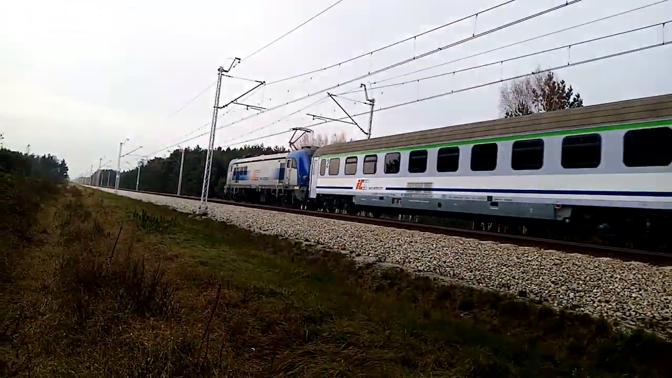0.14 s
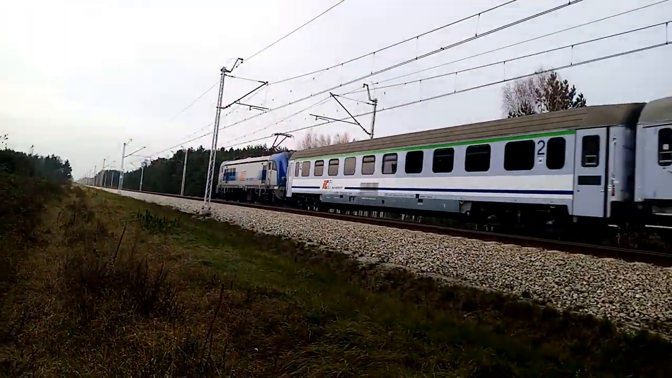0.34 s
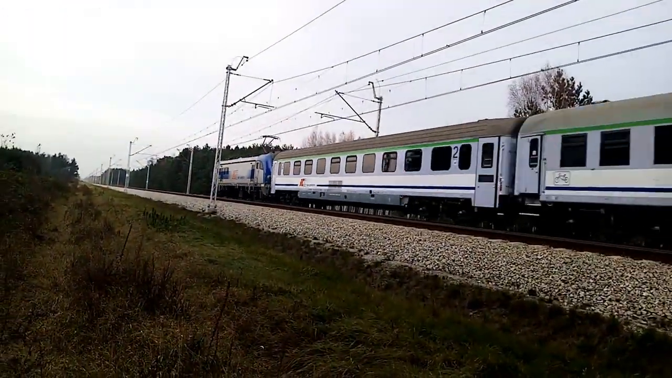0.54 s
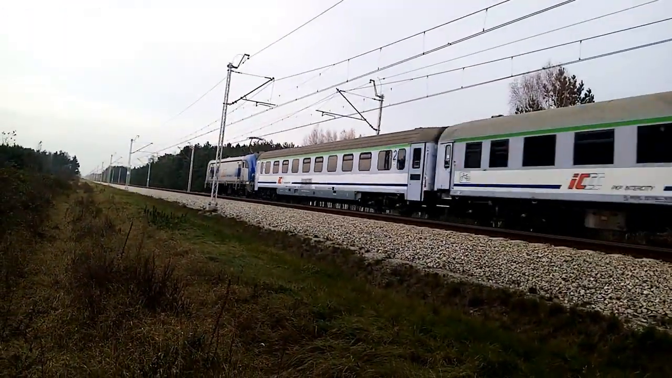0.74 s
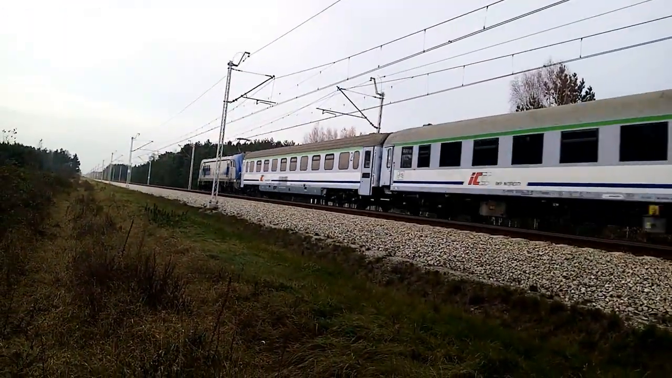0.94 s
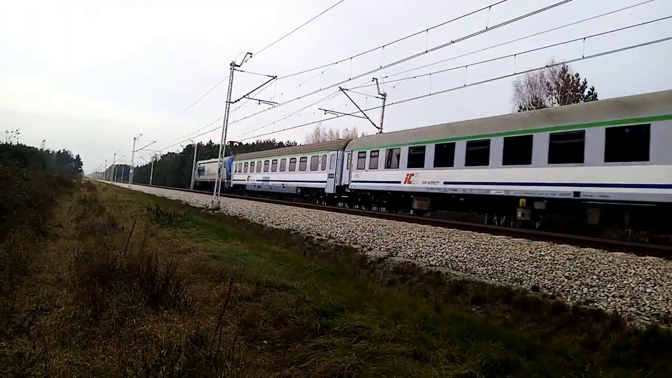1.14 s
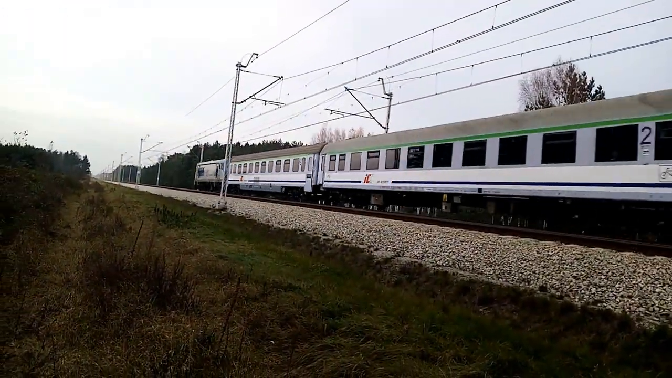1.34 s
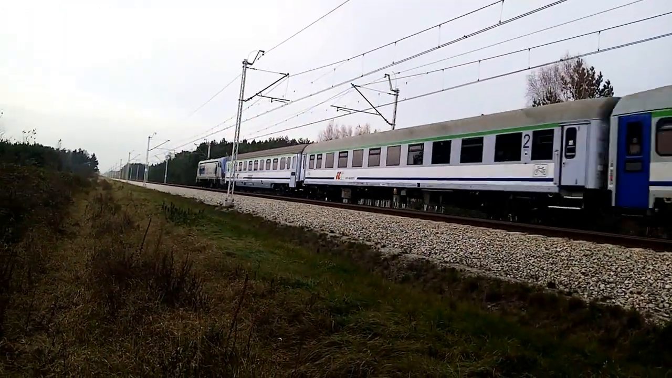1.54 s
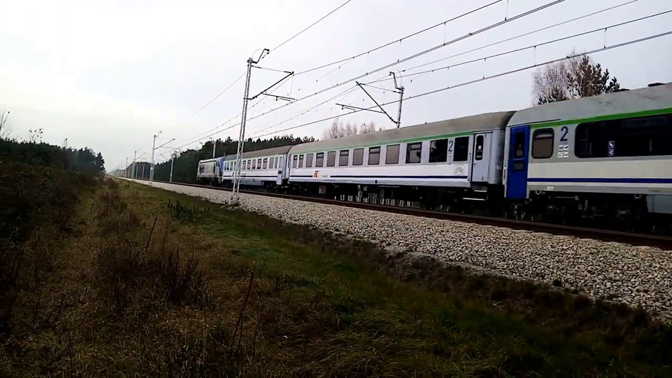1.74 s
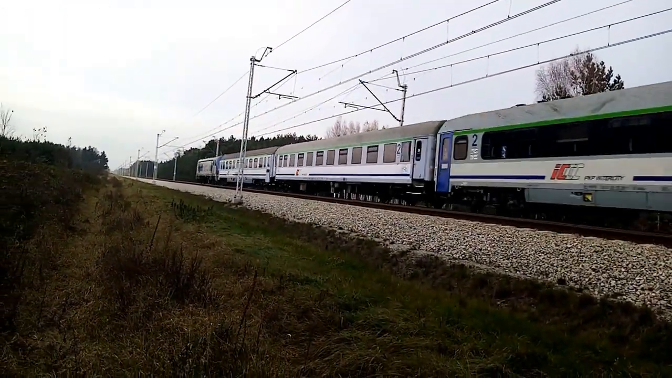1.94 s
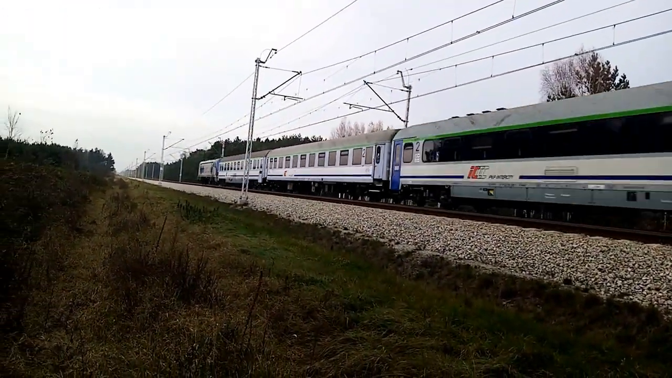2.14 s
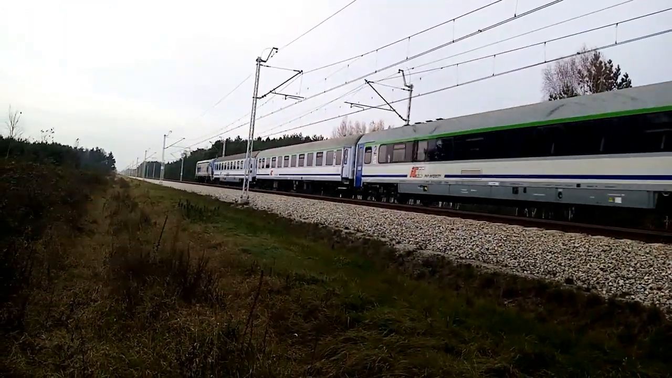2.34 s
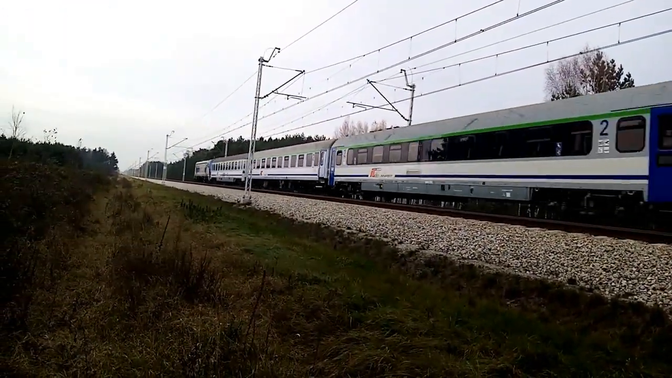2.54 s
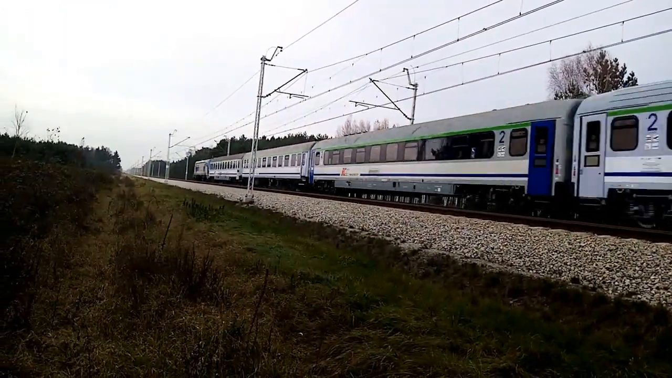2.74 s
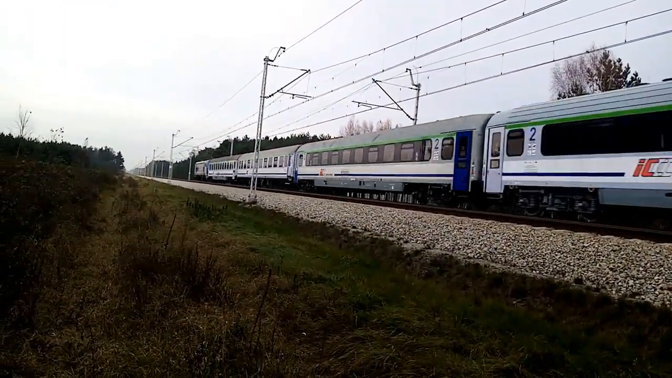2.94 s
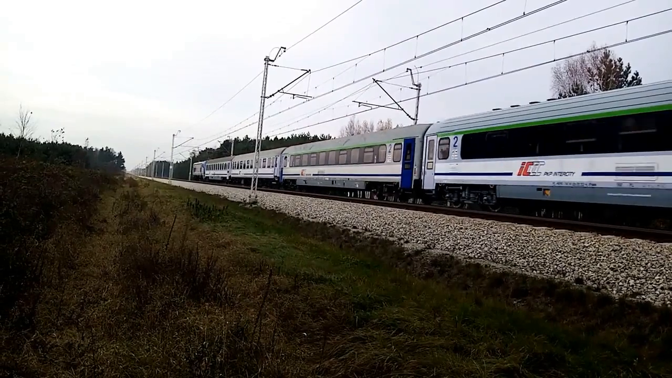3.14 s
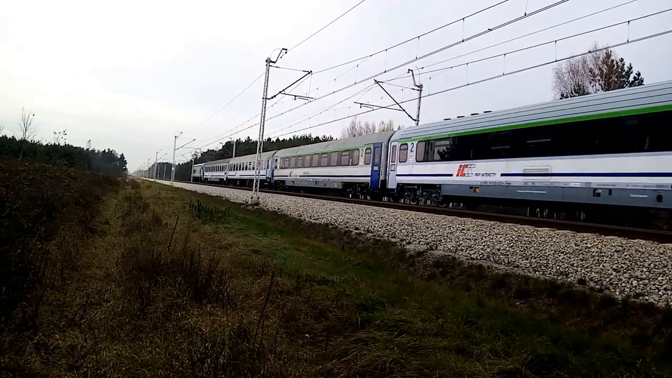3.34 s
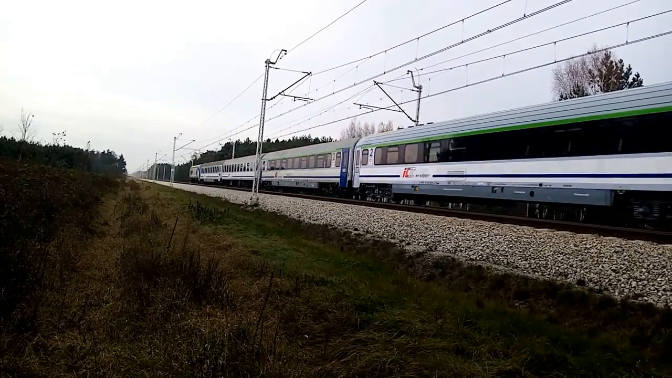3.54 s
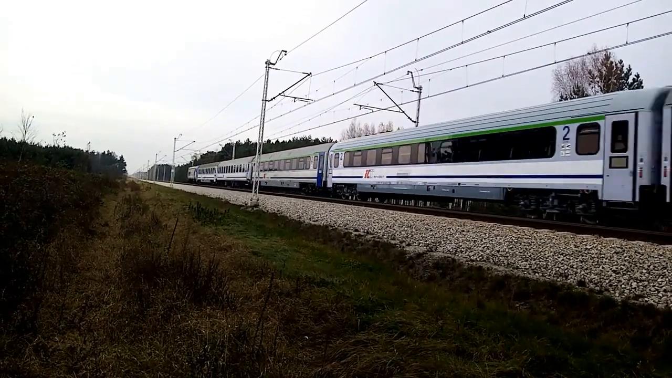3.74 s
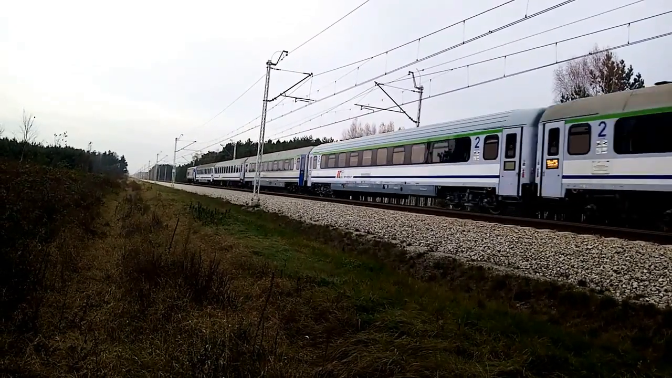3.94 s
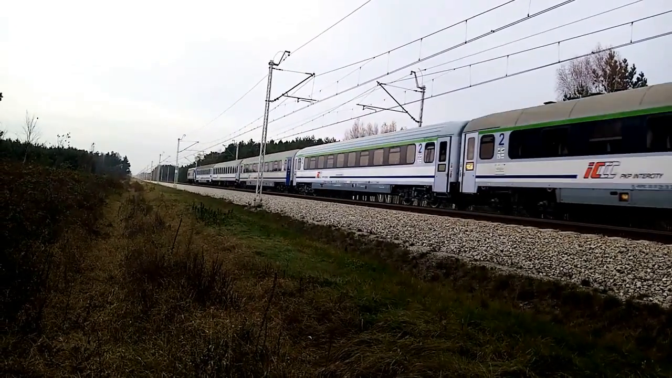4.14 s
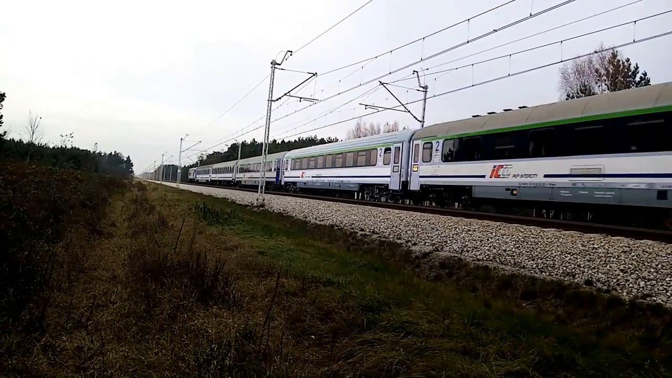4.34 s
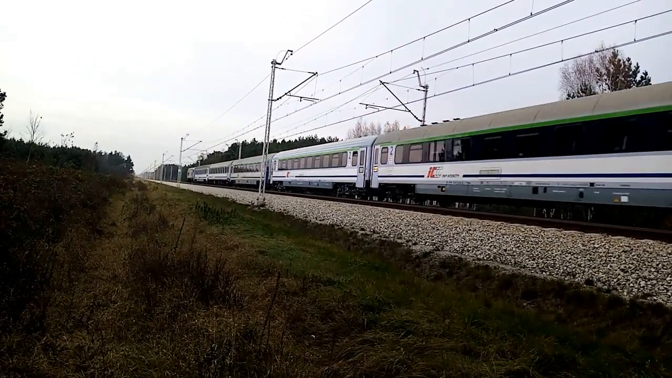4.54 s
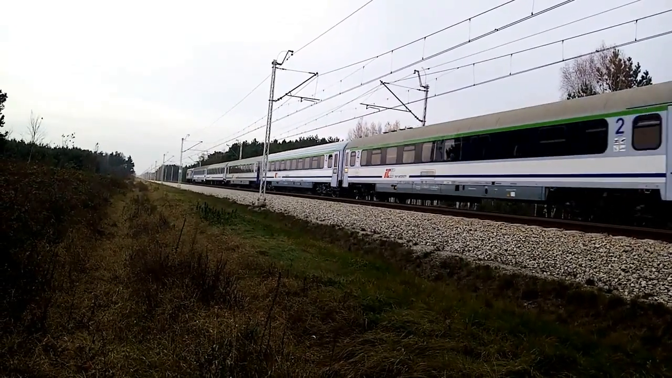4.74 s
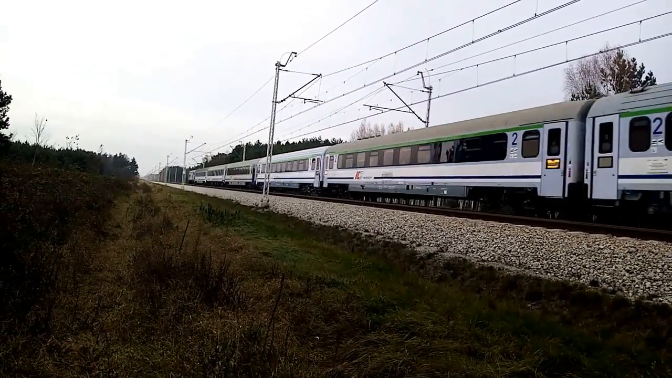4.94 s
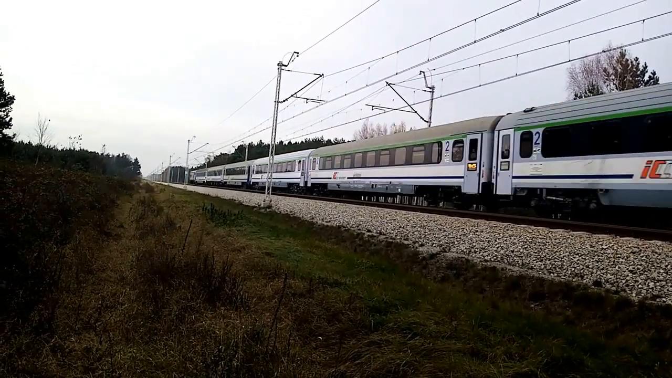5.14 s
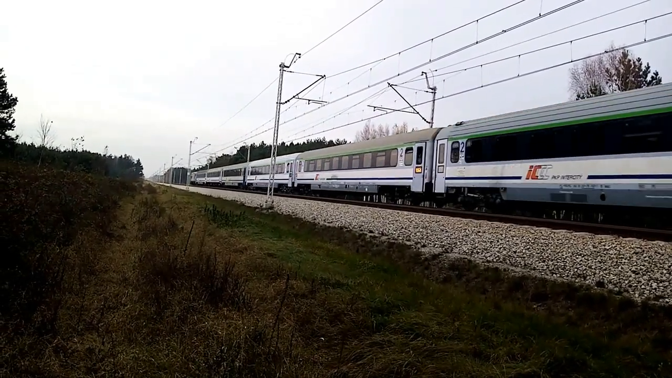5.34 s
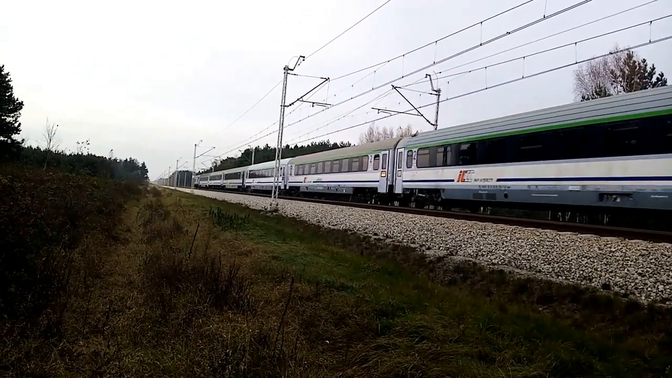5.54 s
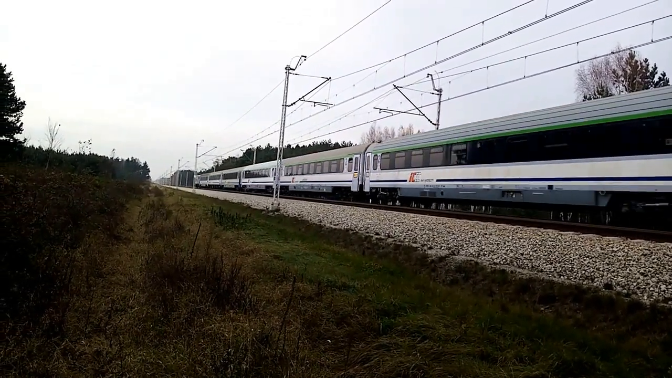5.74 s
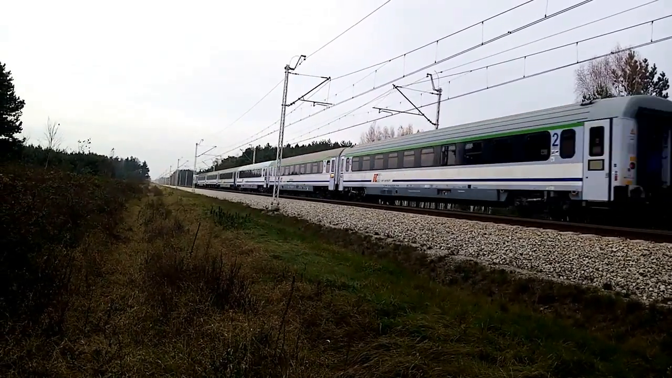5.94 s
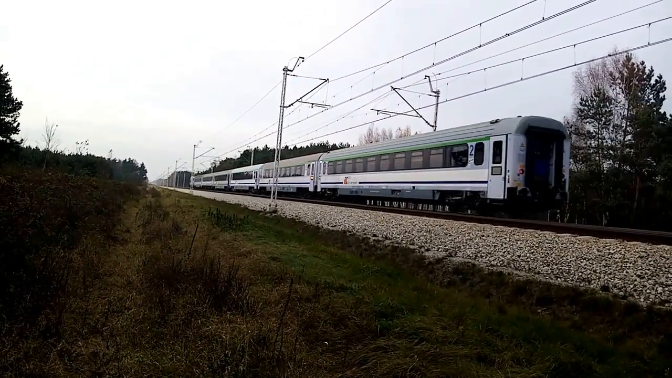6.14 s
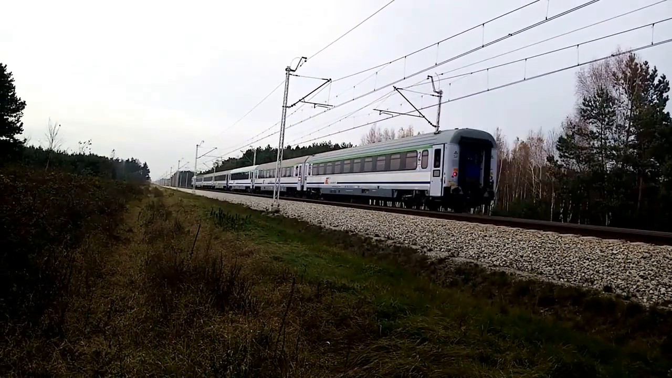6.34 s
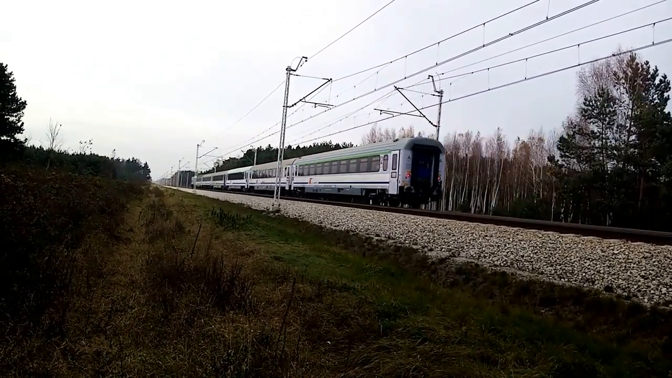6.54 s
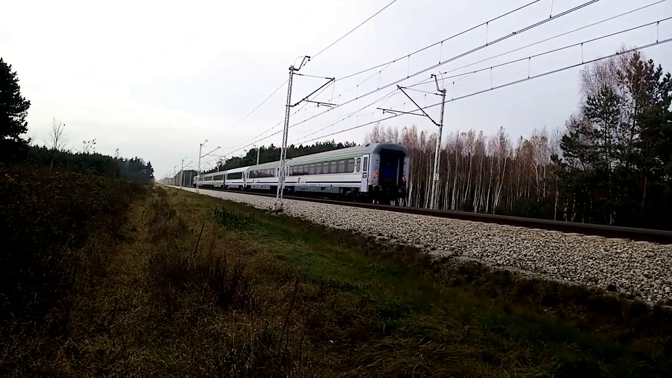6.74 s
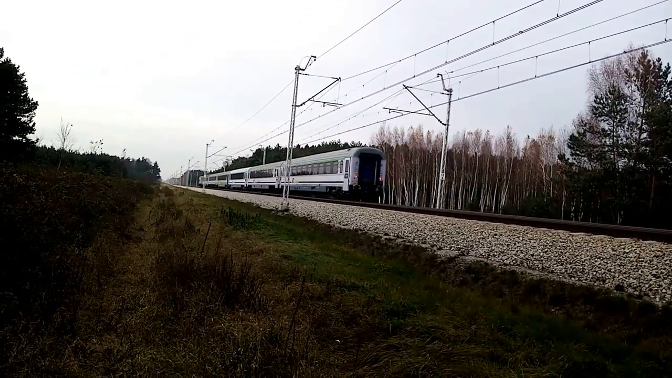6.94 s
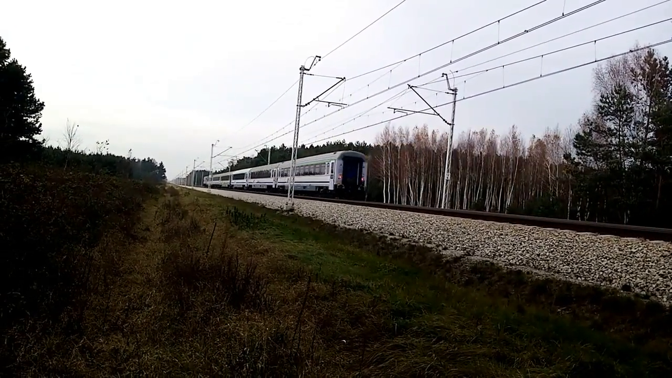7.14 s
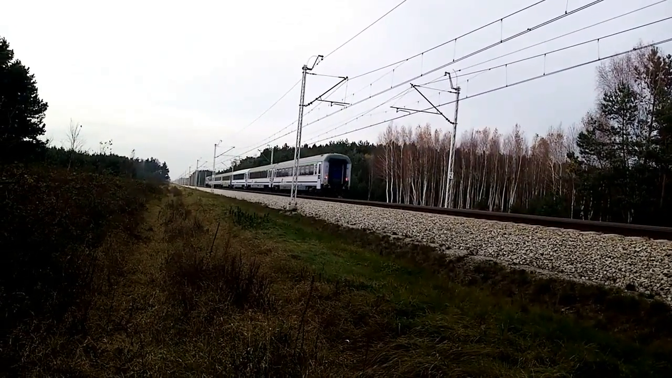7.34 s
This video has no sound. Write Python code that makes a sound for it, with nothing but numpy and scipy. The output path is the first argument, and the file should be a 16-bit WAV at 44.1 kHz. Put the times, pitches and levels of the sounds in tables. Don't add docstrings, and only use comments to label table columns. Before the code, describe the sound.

The train is already passing loudly at 0 s: a broad, gritty rolling roar, strongest in the mids, with modest low rumble and airy hiss above. Two rail resonances, around 1.5 and 1.9 kHz, sing through it, wavering and sinking. Coupled wheel pairs swell near 0.9, 2, 3, 4.2 and 5.3 s, the first strongest, with brief metallic rings and whines; a broader, higher singing rises around 2.7 s. From about 4.5 s smoother coaches soften the roughness, leaving clearer clustered wheel rings. Between 5.3 and 6.3 s a worn wheel pulses about eight or nine times a second near 1.8 kHz, loudest around 5.8 s. After 6.1 s the close detail falls away into a receding rush, with a tiny dull far knock at 6.55 s, still fading at 7.4 s. The small outdoor microphone clips slightly on peaks and has thin, broken treble.

```python
import sys
import numpy as np
from scipy import signal
from scipy.fft import rfft, irfft
from scipy.io import wavfile
from scipy.ndimage import uniform_filter1d

SR = 44100
rng = np.random.default_rng(int(sys.argv[2]) if len(sys.argv) > 2 else 0)


def gain_from_db(level_db):
    decades = np.asarray(level_db, float) / 20
    return 10 ** decades


def file_out(sig):
    cols = np.atleast_2d(sig).T
    lim = np.clip(cols, -1, 1)
    pcm = np.round(lim * 32767).astype(np.int16)
    wavfile.write(sys.argv[1], SR, pcm)


N = 326031

# (mean [dB], share of load, share of nearness, share of couplings, smooth treads [dB])
WIND, RUMBLE = (-48, 0.55, -0.2, -0.2, 2), (-39.5, 0.26, 0.42, 0.1, 2.5)
SLEEPERS, FOOT = (-33, 1.25, 0.12, -0.26, -0.5), (-22, 1.04, -0.04, 0.03, 1.1)
DISCS, HISS = (-23.5, 0.07, 0.45, -0.8, 0.5), (-24.5, -0.26, 1.05, 0.25, -2.2)
RAIL_LOW, RAIL_UP = (-20, 0.41, 0.3, 0.85, -5), (-21, 0.15, 0.73, 0.2, -0.8)
WEB, AIR = (-26.5, 1.14, 1.04, 0.4, -1), (-58.5, .1, 1.2, .6, -0.5)


def in_time(rows):
    s, *columns = np.transpose(rows)
    return [np.interp(np.arange(N) / SR, s, column) for column in columns]


def hump(s, half_s):
    return np.exp(-((np.arange(N) / SR - s) / half_s) ** 2)


def rms_one(x):
    return x / np.sqrt(np.mean(np.abs(x) ** 2) + 1e-20)


def drift(rate):
    pole = np.exp(-80 * np.pi * rate / SR)
    noise = rng.standard_normal(N // 40 + 2002)
    slow = signal.lfilter([1], [1, -2 * pole, pole * pole], noise)[2000:]
    return np.interp(np.arange(N) / 40, np.arange(len(slow)), rms_one(slow))


def coloured(outline):
    hz = np.maximum(np.fft.rfftfreq(N, 1 / SR), 1)
    outline_hz, outline_db = np.transpose(outline)
    shape_db = np.interp(np.log(hz), np.log(outline_hz), outline_db, -120, -120)
    return rfft(rng.standard_normal(N)) * gain_from_db(shape_db)


def narrow(hz, width_hz):
    white = rng.standard_normal((2, len(hz) + 1999))
    low_pass = signal.butter(2, width_hz / 2, fs=SR, output="sos")
    swell = signal.sosfilt(low_pass, white[0] + 1j * white[1])[1999:]
    carrier = np.exp(2j * np.pi * np.cumsum(hz) / SR)
    return np.sqrt(2) * np.real(rms_one(swell) * carrier)


def smooth_treads():
    from_s, change_s = 4.45, .15
    return np.clip((np.arange(N) / SR - from_s) / change_s / 2 + .5, 0, 1)


def part_db(part):
    # (time [s], level [dB])
    load_rows = [(0.0, -20), (0.61, -18), (1.01, -19.5), (2.96, -20), (3.58, -22.5), (3.85, -21),
                 (5.12, -26), (5.78, -25), (7.37, -29), (7.39, -28)]
    # (time [s], level [dB])
    near_rows = [(0.0, -25), (0.68, -26.5), (1.25, -23.5), (1.5, -24.5), (1.95, -21.5), (2.35, -23.5),
                 (3.0, -22), (3.6, -23), (4.2, -23), (4.55, -25.5), (4.9, -25), (5.33, -26), (5.7, -27),
                 (6.13, -31), (7.39, -38)]
    # (time [s], level [dB])
    coupling_rows = [
        (0.0, 1.5),
        (0.92, 5.5),
        (1.95, 3),
        (2.95, 1.5),
        (4.15, 1.5),
        (5.3, 3),
    ]
    load, near = in_time(load_rows)[0], in_time(near_rows)[0]
    couplings = sum(db * hump(s, half_s=0.17) for s, db in coupling_rows)
    mean_db, of_load, of_near, of_couplings, smooth_db = part
    level_db = mean_db + of_load * (load - load.mean()) + of_near * (near - near.mean())
    return level_db + of_couplings * couplings + smooth_db * smooth_treads()


def roar(parts_db, outline, low_hz, high_hz, patchy_db, throb_db):
    part_hz = [55, 170, 460, 880, 3000, 6200]
    flutter_rate = 8.5
    noise = coloured(outline)
    hz = np.maximum(np.fft.rfftfreq(N, 1 / SR), 1)
    place = 4 * np.log2(hz / low_hz)
    out, shared = np.zeros(N), drift(4.0)
    for k in range(int(4 * np.log2(high_hz / low_hz)) + 1):
        band = irfft(noise * np.clip(1 - np.abs(place - k), 0, 1), N)
        centre = np.log(low_hz * 2 ** (k / 4))
        level_db = 0
        for part, one in zip(parts_db, np.eye(len(parts_db))):
            share = np.interp(centre, np.log(part_hz[-len(parts_db):]), one)
            level_db = level_db + share * (part - np.mean(part))
        flicker_db = patchy_db * (drift(3.9) + 0.4 * shared)
        throb = throb_db * drift(flutter_rate)
        out += band * gain_from_db(level_db + flicker_db + throb)
    return rms_one(out)


def rolling_roar(parts):
    # (frequency [Hz], level [dB per Hz])
    low_colour = [(15, -62), (25, -40.5), (86, -11), (152, -19), (233, -14), (335, -16.5), (409, -10.5),
                  (628, -6.5), (741, 0.5), (950, -2), (1140, -9), (1300, -13), (1690, -13), (2860, -120)]
    # (frequency [Hz], level [dB per Hz])
    high_colour = [(1000, -28), (1250, -3.5), (1700, 2), (2100, -2), (2280, -4), (2700, -6.5), (3300, -5.5),
                   (4400, -6.5), (5200, -5.5), (5800, -9), (6500, -8.5), (7500, -12), (8100, -16.5),
                   (8700, -21), (9200, -24.5)]
    low = gain_from_db(-21.0) * roar(parts, low_colour, 24.4, 1500, patchy_db=.5, throb_db=.5)
    high = gain_from_db(-20.0) * roar(parts[4:], high_colour, 1025, 10000, patchy_db=0.26, throb_db=1.57)
    return low + high


def rail():
    # (time [s], lower [Hz], upper [Hz], swell of the upper [dB])
    resonances = [(0.0, 1571, 1810, .1), (0.55, 1549, 1900, -0.5), (1.0, 1526, 2000, 2),
                  (1.4, 1502, 1950, 3), (1.75, 1482, 1930, -3.5), (2.2, 1470, 1950, 0),
                  (2.9, 1455, 1945, 0), (3.6, 1494, 1878, 1), (4.2, 1505, 1898, 0), (4.55, 1531, 1835, 1),
                  (5.1, 1521, 1850, 1.5), (6.05, 1480, 1800, -1), (7.39, 1475, 1843, -1.5)]
    # (middle [s], frequency [Hz], half length [s], level [dB])
    whines = [(0.2, 1716, .2, -35), (0.9, 1562, 0.11, -18.5), (1.05, 2004, 0.11, -18.5),
              (1.9, 1452, .15, -26.5), (2.12, 1440, 0.11, -21), (2.87, 1436, 0.11, -17.5),
              (2.93, 1941, .1, -18), (3.2, 1520, .1, -18), (3.5, 1465, .1, -29), (4.17, 1541, .12, -17),
              (4.45, 1847, .12, -25.5), (4.6, 1800, .15, -25), (4.75, 1825, .1, -23),
              (4.88, 1851, 0.14, -26), (5.15, 1872, .12, -22)]
    low_hz, up_hz, swell_db = in_time(resonances)
    low_db, up_db = part_db(RAIL_LOW), part_db(RAIL_UP) + swell_db
    low = narrow(low_hz, width_hz=200) + gain_from_db(-7.5) * narrow(low_hz * .975, width_hz=69)
    up = narrow(up_hz, width_hz=263) + gain_from_db(-4.5) * narrow(up_hz * .995, width_hz=60)
    singing = gain_from_db(low_db - 4.0) * low + gain_from_db(up_db - 4.5) * up
    return singing + rings(whines, width_hz=35, sink=0.0068, gain_db=-2.0)


def rings(rows, width_hz, sink, gain_db):
    out = np.zeros(N + 2 * SR)
    for s, hz, length, db in rows:
        along = np.linspace(-1, 1, int(2 * length * SR))
        start = int((s - length + 1) * SR)
        swell = np.cos(along * np.pi / 2) ** 1.05
        out[start:start + len(along)] += gain_from_db(db + gain_db) * swell * narrow(hz * (1 - sink * along), width_hz)
    return out[SR:SR + N]


def rough_wheels():
    # (middle [s], frequency [Hz], half length [s], level [dB])
    bogies = [(0.1, 1700, 0.36, -19), (0.5, 1700, 0.39, -20), (0.95, 1690, .3, -22), (0.2, 2150, 0.34, -27),
              (2.1, 2130, 0.34, -30.5), (3.7, 1720, 0.32, -26), (4.65, 2900, .25, -34),
              (4.75, 1650, .3, -30), (4.9, 2400, 0.27, -30), (5.15, 2870, 0.23, -32), (5.55, 2900, .2, -29),
              (5.65, 2280, 0.2, -24.5), (5.85, 3450, 0.22, -35), (6.1, 2870, 0.28, -36),
              (6.4, 2880, 0.34, -38)]
    modes = [(0.35, 3970, 0.15, -40), (0.83, 2550, 0.11, -29), (0.86, 3250, 0.34, -37),
             (0.87, 2800, 0.25, -29), (1.0, 3850, 0.21, -34), (1.04, 4930, 0.23, -35.5),
             (1.51, 4710, .18, -34), (1.64, 7100, .17, -37.5), (1.9, 4750, 0.47, -34), (1.9, 5433, .3, -37),
             (2.02, 6200, .15, -33), (2.03, 7740, .17, -38), (2.1, 3550, .2, -36), (2.28, 6590, 0.081, -33),
             (2.28, 7650, 0.19, -36), (2.7, 2500, 0.23, -28), (2.82, 4085, .17, -34.5),
             (2.89, 3250, .17, -32), (3.06, 2630, .33, -32), (3.06, 6770, .1, -31), (3.36, 6900, .16, -37),
             (3.59, 4287, .1, -33), (3.71, 3000, .41, -36), (3.87, 3970, 0.24, -33),
             (4.09, 2456, 0.19, -29), (4.14, 3550, 0.18, -30), (1.25, 5120, .25, -30),
             (1.2, 4720, 0.28, -35), (2.45, 2610, .3, -33)]
    worn = [
        (5.34, 1820, .05, -13.5),
        (5.45, 1820, 0.046, -20),
        (5.53, 1837, 0.036, -19),
        (5.66, 1800, .06, -12),
        (5.80, 1754, 0.053, -9.5),
        (5.91, 1770, 0.064, -10.5),
        (6.03, 1785, .06, -12.5),
        (6.15, 1784, 0.059, -27),
        (6.27, 1800, .06, -24),
    ]
    out = rings(bogies, width_hz=143, sink=0.00997, gain_db=1.0)
    out += rings(modes, width_hz=78, sink=0.00814, gain_db=-0.5)
    return out + rings(worn, width_hz=28, sink=0.0032, gain_db=-8.5)


def web():
    rough_hz, smooth_hz = 2700, 2850
    hz = rough_hz + (smooth_hz - rough_hz) * smooth_treads()
    loud_db = 5.0 * hump(2.75, half_s=0.32)
    return gain_from_db(part_db(WEB) + loud_db - 9.0) * narrow(hz, width_hz=320)


def axles(rows, modes):
    out = []
    for s, pitch, length, db in rows:
        for hz, mode_db in modes:
            middle_s = s + .025 * rng.standard_normal()
            out.append((middle_s, hz * pitch, length, db + mode_db + 1.0 * rng.standard_normal()))
    return out


def smooth_wheels():
    # (frequency [Hz], level [dB])
    wheel_a = [(2815, -1), (2930, -3), (3580, -1.5), (4320, 0), (5070, -7), (5470, -5), (6730, -7),
               (7280, -6), (7650, -8)]
    wheel_b = [(2450, -5), (3060, -10), (3450, 0), (4120, -3.5), (5200, -8), (5800, -9), (7360, -14)]
    # (middle [s], pitch factor, half length [s], level [dB])
    axles_a = [
        (4.63, 1, .14, -29.5),
        (5.4, 1, .17, -25),
    ]
    axles_b = [
        (4.4, 1, .15, -32),
        (5.18, 1, .17, -25.5),
        (5.66, .945, .15, -29.5),
        (5.82, .997, .14, -27.5),
    ]
    chords = axles(axles_a, wheel_a) + axles(axles_b, wheel_b)
    return rings(chords, width_hz=85, sink=0.01, gain_db=-1)


def stray_rings(disc_db, hiss_db):
    count, last_wheel_s = 330, 6.1
    when, pitch, length, size = rng.random((count, 4)).T
    s, hz = when * last_wheel_s, 2200 * 3.2 ** pitch
    at = (s * SR).astype(int)
    db = (1 - pitch) * disc_db[at] + pitch * (hiss_db[at] - 2.5) - 13.5 + 6.9 * size
    rows = np.transpose([s, hz, .1 + .2 * length, db])
    return rings(rows, width_hz=49, sink=0.00604, gain_db=-2.0)


def air():
    # (frequency [Hz], level [dB per Hz])
    air_colour = [(8500, -13), (9500, 7.5), (11000, -1), (12000, -6.5), (13600, -14), (15200, -7),
                  (15800, -8)]
    return gain_from_db(part_db(AIR) + 3.5) * rms_one(irfft(coloured(air_colour), N))


def far_joint():
    # (middle [s], frequency [Hz], half length [s], level [dB])
    knock = [
        (6.55, 240, .009, -30),
    ]
    return rings(knock, width_hz=200, sink=.05, gain_db=0)


def scene():
    parts = [part_db(part) for part in (WIND, RUMBLE, SLEEPERS, FOOT, DISCS, HISS)]
    wheels = rough_wheels() + web() + smooth_wheels() + stray_rings(*parts[4:])
    return (rolling_roar(parts) + rail() + wheels + air() + far_joint())[None]


def thin_treble(x):
    # (frequency [Hz], level [dB])
    treble_step = [(7600, -20), (8300, -10), (8800, 4), (9500, 0), (10800, 3), (11200, -6), (12400, -1),
                   (13600, 3), (15000, -3), (15800, 6)]
    faintest_db, scatter_db = -92, 4.0
    hz, s, frames = signal.stft(x, SR, nperseg=2048)
    power = uniform_filter1d(np.abs(frames) ** 2, size=41, axis=0)
    local = np.sqrt(uniform_filter1d(power, size=9, axis=1))
    jumps = rng.standard_normal((33, len(s))).repeat(32, axis=0)[:len(hz)]
    jumps = uniform_filter1d(jumps, size=2, axis=1) * np.sqrt(2)
    step_db = np.interp(hz, *np.transpose(treble_step), left=-99)[:, None] + scatter_db * jumps
    faintest = gain_from_db(faintest_db + 3.0 * jumps) * (hz[:, None] > 12200)
    kept = np.abs(frames) > np.maximum(local * gain_from_db(step_db), faintest)
    return signal.istft(frames * kept, SR, nperseg=2048)[1][:N]


def band_limit(x):
    return signal.sosfilt(signal.butter(12, 15830, fs=SR, output="sos"), x)


def record(dry):
    overload = 0.7
    mix = np.clip(thin_treble(dry[0])[None], -overload, overload)
    return band_limit(mix)


dry = scene()
out = record(dry)
file_out(out)
```